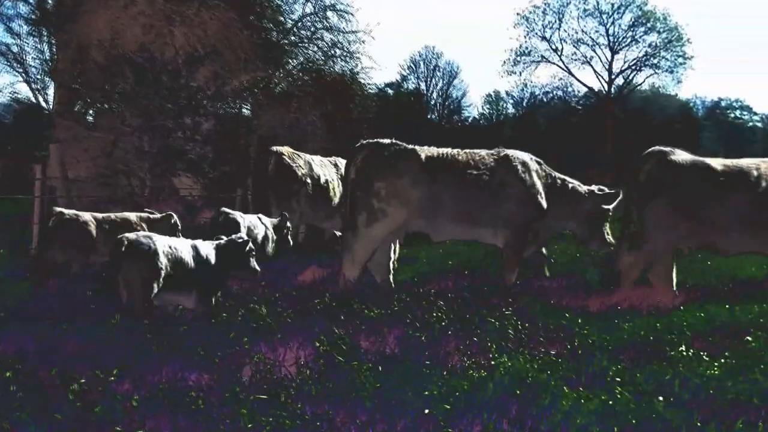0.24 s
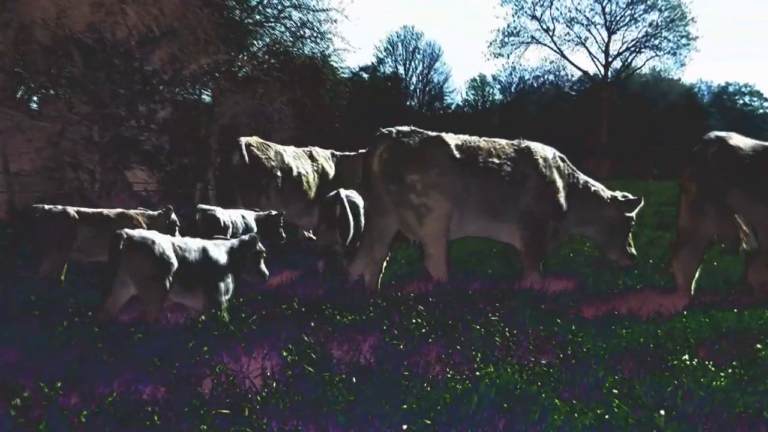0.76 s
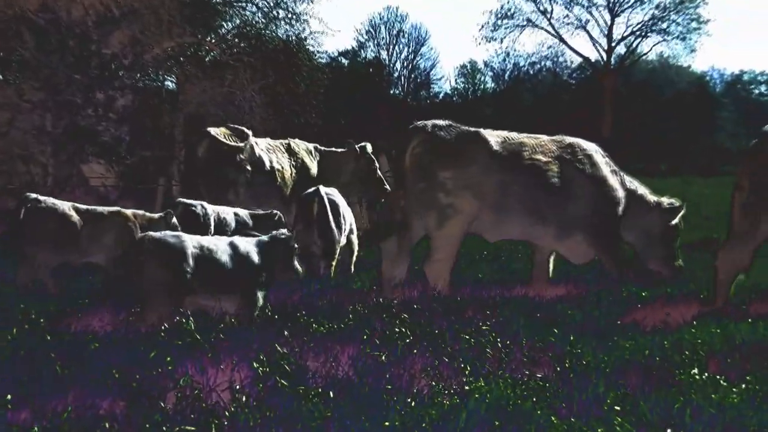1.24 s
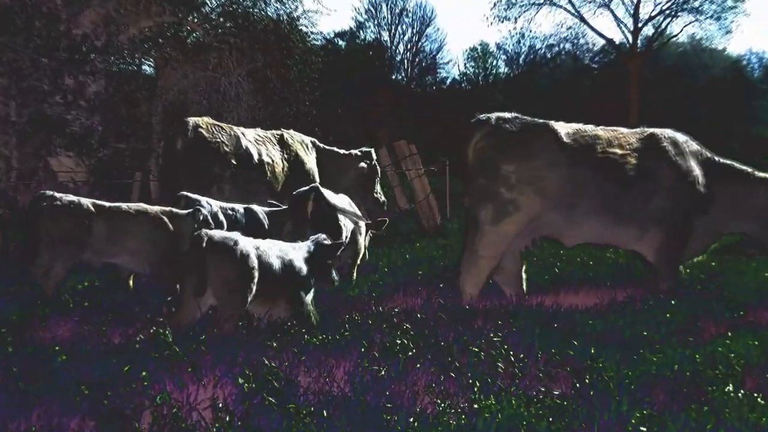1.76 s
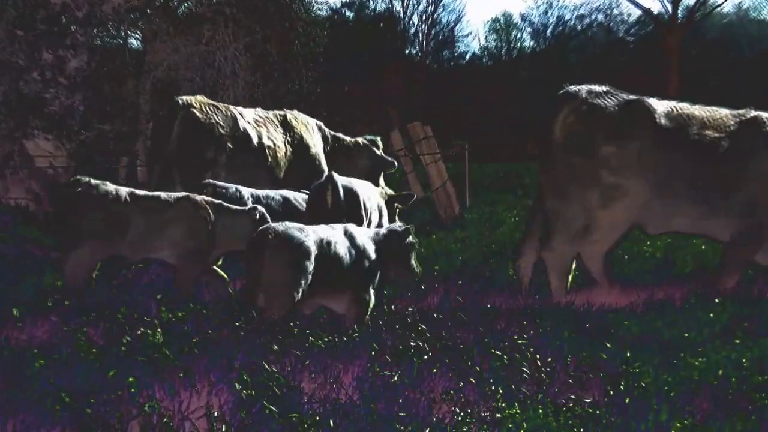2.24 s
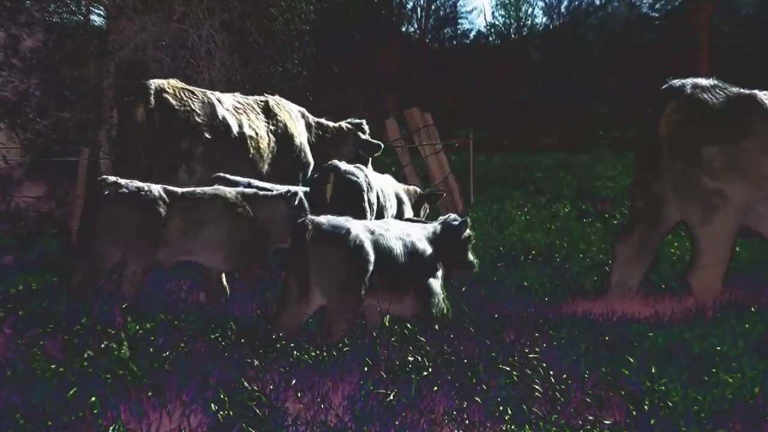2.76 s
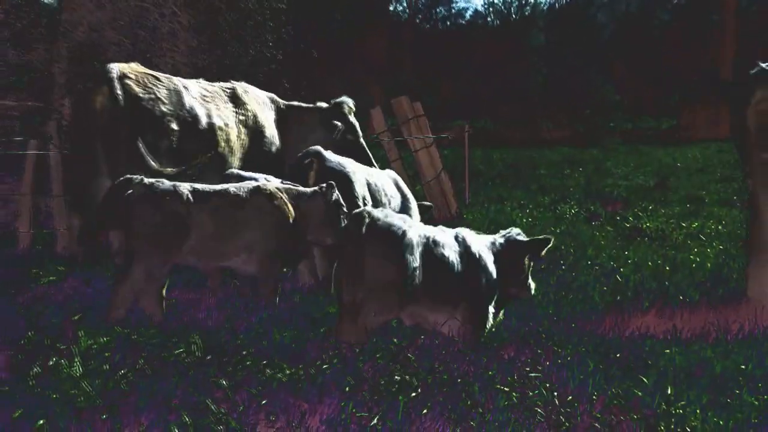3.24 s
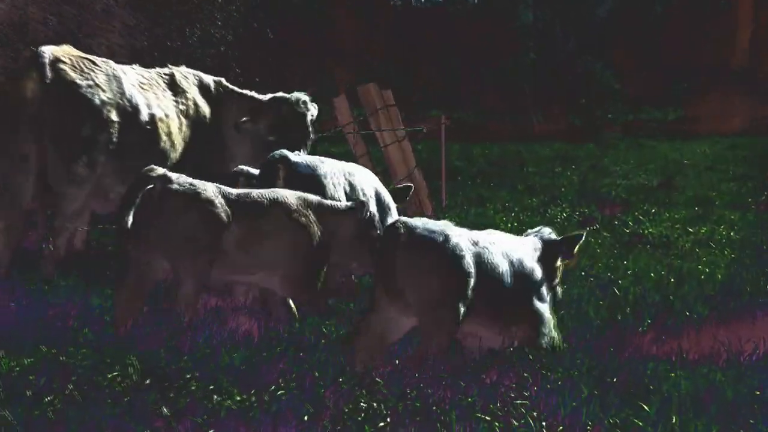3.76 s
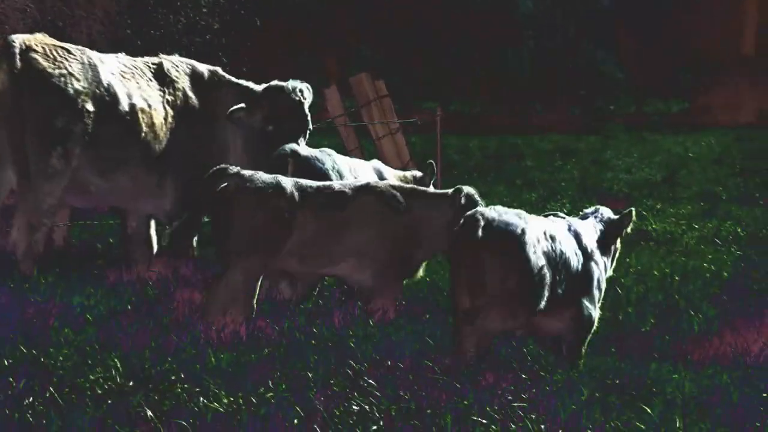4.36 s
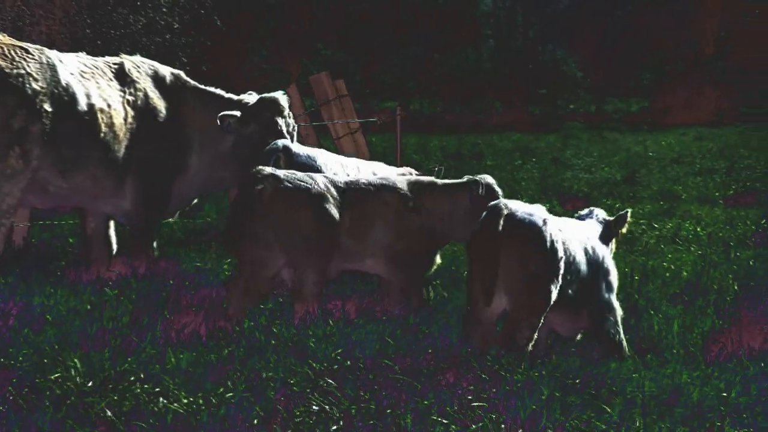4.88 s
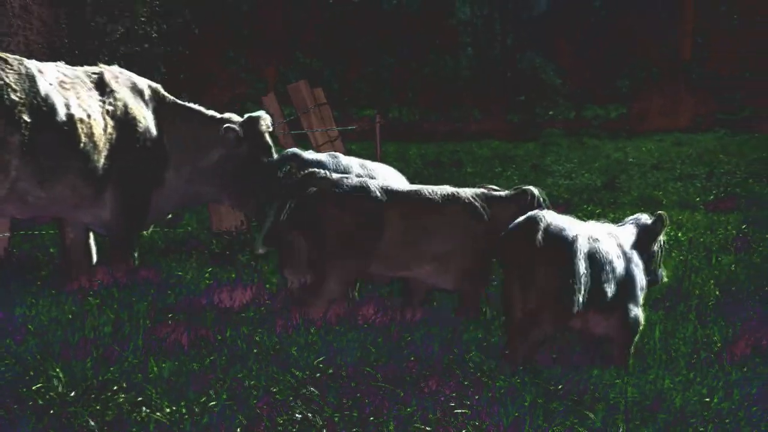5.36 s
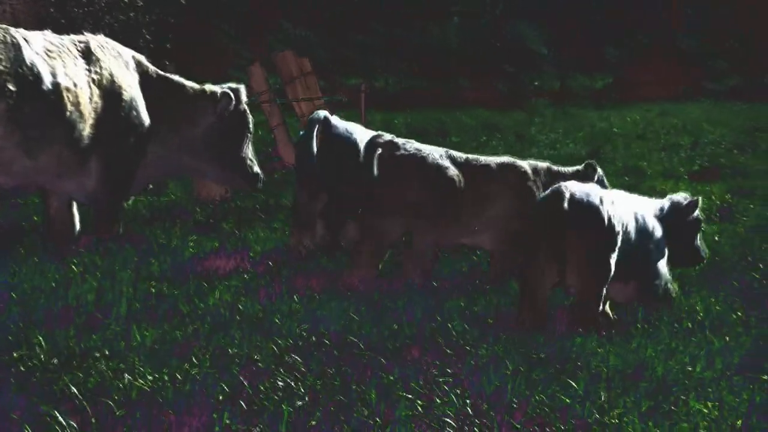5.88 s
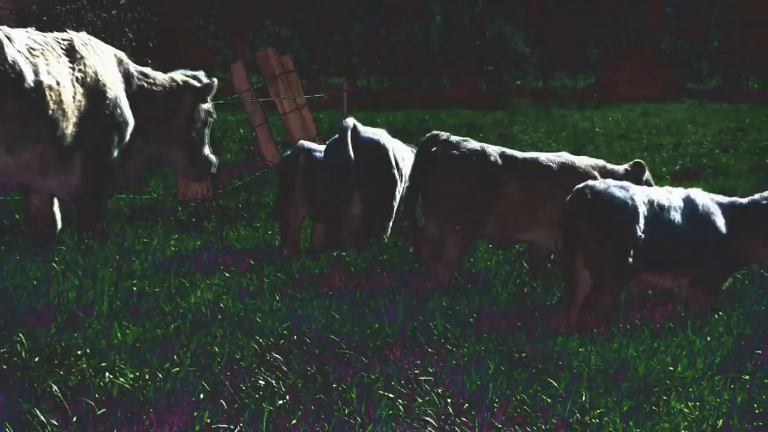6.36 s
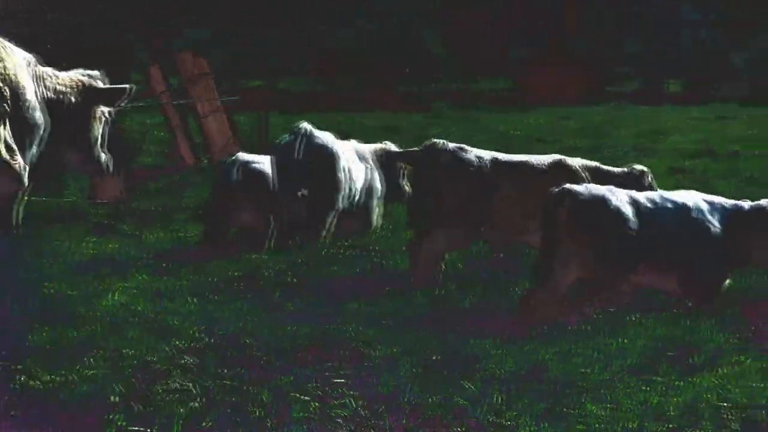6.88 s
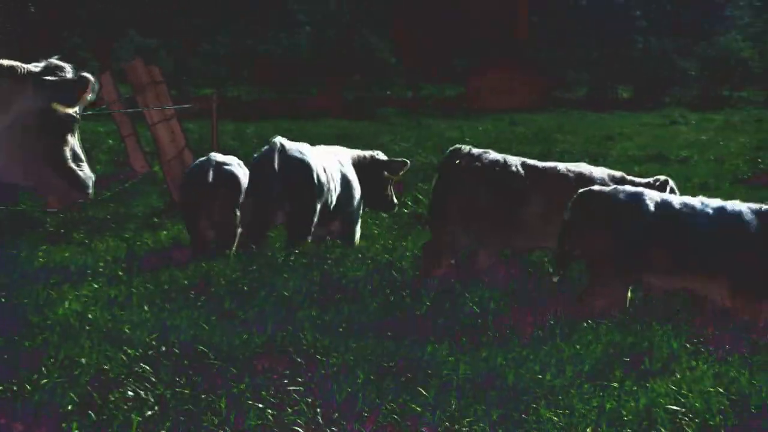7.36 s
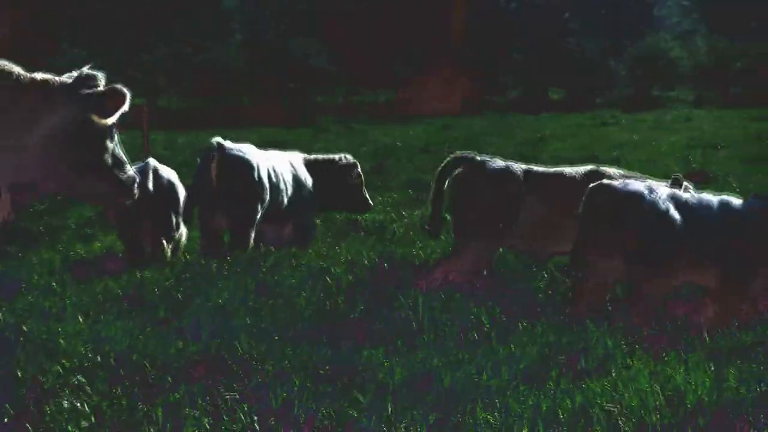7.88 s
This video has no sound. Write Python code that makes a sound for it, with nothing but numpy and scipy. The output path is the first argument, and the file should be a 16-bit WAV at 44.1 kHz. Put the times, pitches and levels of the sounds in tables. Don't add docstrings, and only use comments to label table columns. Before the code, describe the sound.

Faint leafy wash and thin birdsong with muted hoof thuds, broken by a very loud sharp snap, then scratchy finger rubbing on the camera casing.

```python
import sys
import numpy as np
from scipy import signal
from scipy.io import wavfile
from scipy.ndimage import uniform_filter1d

SR = 44100
rng = np.random.default_rng(int(sys.argv[2]) if len(sys.argv) > 2 else 0)


def unload_wav(signal):
    wavfile.write(
        sys.argv[1],
        SR,
        np.round(np.clip(np.atleast_2d(signal).T, -1, 1) * 32767).astype(np.int16),
    )


def gain_from_db(level_db):
    decades = np.asarray(level_db, float) / 20
    return 10 ** decades


N = 358533

# (time [s], peak [dB], left-right [dB], brightness [dB per octave])
SNAPS = [(0.1003, -30.5, -1, -2), (0.107, -42, -1, -3), (0.177, -22.5, -8, 3), (3.7863, -21.5, -5, -4),
         (4.29115, 4.5, -14, 13), (4.734, -34, -15, 6), (5.044, -43, -7, 6), (5.221, -30, 0, 19),
         (5.424, -21.5, -7, -9), (5.9015, -32, -9, -2), (6.0795, -28, -7, 7), (6.1483, -26.5, -3.0, 14),
         (6.275, -29, -4, 17), (1.885, -34, -1, 2), (4.128, -38.5, -1, 31), (5.0782, -32, -13, 15),
         (5.492, -28, -3, 16), (5.985, -42, -3, 27), (6.292, -33.5, -3, 27), (6.308, -40, -3, 8),
         (8.011, -44, -4, 18), (8.028, -42, -2, 20)]
# (lowest [Hz], highest [Hz])
FAST_FALL_HZ = (4500, 7150)


def evened(x):
    return x / np.sqrt(np.mean(x ** 2) + 1e-20)


def read(points, hz):
    f, value = np.transpose(points)
    return np.interp(np.log(hz + 1), np.log(f + 1), value)


def add(mix, s, sound, pan_db):
    part = mix[:, round(s * SR):][:, :np.shape(sound)[-1]]
    part += sound[..., :part.shape[1]] * gain_from_db([[pan_db / 2], [-pan_db / 2]])


def below(x, edge_hz):
    taps = signal.firwin(511, edge_hz, window=("kaiser", 9), fs=SR)
    return signal.oaconvolve(x, taps[None], "same")


def snaps():
    # (pitch [Hz], level [dB], time to fall 60 dB [s])
    housing_modes = [(910, -32, 0.046), (1480, 12, 0.021), (1990, 9.5, 0.019), (2360, 20.5, 0.0105),
                     (2900, 17.5, 0.0096), (3314, 25, 0.004), (3690, 12.5, 0.011), (4420, 16.5, 0.0059),
                     (4995, 9.5, 0.01), (5450, -6, 0.01), (6740, -7, 0.01), (7730, -16.5, 0.017),
                     (8980, -32, 0.016), (12600, -21, 0.0014)]
    mix, t = np.zeros((2, N)), np.arange(1300) / SR
    hz, mode_db, t60 = np.transpose(housing_modes)[:, :, None]
    lean_hz = [600, 1000, 1500, 2500, 4500, 7000, 12000]
    lean = np.interp(np.log(hz), np.log(lean_hz), [1.5, 2.4, 1.7, .5, .1, 0, 1.3])
    spreads = rng.uniform(-1, 1, (len(SNAPS), 2, len(hz), 1))
    for (s, db, pan_db, tilt_db), spread in zip(SNAPS, spreads):
        soft = np.clip(-db / 20, 0, 1.3)
        rings = gain_from_db(mode_db + tilt_db * np.log2(hz / 3000) - 60 * t / t60)
        rings *= 1 - np.exp(-t / (0.00017 + .0002 * soft))
        rings *= 1 + .9 * np.exp(-t / .0007)
        turn = 2 * np.pi * hz * (1 + .012 * spread[0]) * t + 1.3 * soft * spread[0]
        pair = []
        for side in (1, -1):
            shift = side * .12 * np.minimum(lean, 1) * spread[1]
            pair.append((rings * gain_from_db(side * pan_db * lean / 2) * -np.sin(turn + shift)).sum(0))
        pair = np.array(pair)
        add(mix, s + 0.00065, gain_from_db(db) * pair / abs(pair.mean(0)).max(), 0)
    return mix


def ring(x, modes):
    t = np.arange(2200) / SR
    body = 0
    for hz, width_hz, db in modes:
        swell = width_hz ** 1.5 * t * np.exp(-1.55 * np.pi * width_hz * t)
        body = body + gain_from_db(db) * swell * np.sin(2 * np.pi * hz * t)
    return signal.oaconvolve(x, body[None], axes=1)[:, :N]


def rubs():
    # (pitch [Hz], width [Hz], level [dB])
    shell = [
        [(500, 250, .1), (300, 220, -5), (900, 400, -5)],
        [(830, 70, 3), (650, 600, -7)],
    ]
    grip = [
        [(1345, 105, 4.5), (1020, 200, -8), (2250, 300, -6), (2470, 80, 5)],
        [(1504, 240, 3.2), (1130, 370, 1), (2150, 540, 1.5)],
    ]
    panels = [
        [(3485, 630, 1.5), (4100, 490, -3.5)],
        [(4465, 460, 1.5), (3980, 350, -2), (3100, 1230, 5), (5230, 1100, -9)],
    ]
    skin_hiss = [[(5550, 2950, 26), (7150, 530, 6.0), (9100, 3000, -6), (12000, 4300, -3)]] * 2
    # (left-right [dB]), then (left-right likeness [0-1])
    part_pan_db = [0, -8, -3, 0.5]
    part_likeness = [.4, .5, .8, .93]
    # (time [s], shell [0-1], grip [0-1], panels [0-1])
    finger = [(4.75, 0.3, 0.86, 0.046), (5.15, .4, 0.63, 0.37), (5.22, 0.31, 0.44, 0.94),
              (5.3, 0.29, 0.41, 0.97), (5.55, 0.15, 0.14, 0.78), (5.88, 0.04, .04, 0.39),
              (5.98, .05, 0.8, .4), (6.13, 0.58, 0.86, 0.56), (6.24, 1, .98, .98), (6.35, 1, 0.88, 0.62),
              (6.42, 0.47, 0.83, 0.33), (6.6, 0.043, 0.69, 0.078), (8.1, 0.19, 0.27, .03)]
    # (time [s], length [s], level [dB], weight [0-1])
    brushes = [
        (.1025, 0.0045, -54.5, 0.76),
        (.78, 0.01, -69, 0.93),
        (.85, 0.015, -69, 1),
        (.932, 0.0073, -63.5, 0.92),
        (1.345, 0.0057, -64, 0.6),
        (1.4, 0.013, -57.5, 0.57),
    ]
    slides = [(4.734, 0.065, -54.5, 0.5), (4.79, 0.067, -54, 0.33), (4.889, 0.047, -54.5, 0.24),
              (5.044, 0.071, -54, 0.058), (5.091, 0.078, -58.5, 0.25), (5.221, 0.028, -48.5, .01),
              (5.24, 0.035, -50.5, 0.49), (5.278, 0.088, -54, 0.66), (5.35, 0.054, -50.5, 0.12),
              (5.425, 0.062, -47, 0.67), (5.469, 0.07, -47, 0.43), (5.533, 0.082, -48, 0.43),
              (5.636, .02, -57, .6), (5.652, 0.029, -51.5, 0.7), (5.706, 0.029, -54, 0.76),
              (5.749, 0.063, -55.5, 0.87), (5.805, 0.067, -53, 0.7), (6.374, 0.029, -56.5, 0.43),
              (6.396, 0.021, -51, 0.48), (5.945, 0.011, -63, 1), (6.665, 0.0057, -48, 0.47),
              (6.677, 0.0084, -48.5, 0.51), (6.538, 0.01, -64, 0.54)]
    shifts = [(5.984, 0.045, -54.5, 1.2), (6.048, 0.017, -52, 1.23), (6.079, 0.023, -54, .01),
              (6.105, 0.044, -47.5, 1.16), (6.141, 0.042, -50, 0.011), (6.243, 0.017, -57, 1),
              (6.21, 0.048, -61.5, 1.05), (6.256, 0.057, -45.5, 0.93), (6.534, 0.017, -50.5, 1.1),
              (6.977, 0.01, -55.5, 1.2), (7.205, 0.012, -62, 0.4), (8.036, 0.036, -59, 0.75),
              (8.078, 0.18, -47.5, 0.27)]
    # (shell [dB], grip [dB], panels [dB], skin hiss [dB])
    brush_mix = [
        (-38, -6, 0, 4),
        (6, 9, 0, -17),
    ]
    slide_mix = [
        (-23, -6, 0, -3),
        (2.5, 3.5, 0, -15),
    ]
    shift_mix = [
        (-4.5, -26, 0, -29),
        (-2.5, -2.5, 0, -18.5),
    ]

    slips = rng.standard_normal((2, N)) * gain_from_db(1.6 * rng.exponential(1, N))
    slips *= rng.random(N) < 12000 / SR
    wobble = gain_from_db(1.1 * evened(uniform_filter1d(rng.standard_normal(N), 300)))
    touch_s, *places = np.transpose(finger)
    places = places + places[-1:]
    places = [np.clip(np.interp(np.arange(N) / SR, touch_s, place), 0, 1) for place in places]
    strokes = []
    for rows, (light, full) in ((brushes, brush_mix), (slides, slide_mix), (shifts, shift_mix)):
        for s, length, db, weight in rows:
            strokes.append((s, length, db + np.add(light, weight * np.subtract(full, light))))

    mix = np.zeros((2, N))
    for k, part in enumerate([shell, grip, panels, skin_hiss]):
        pressure, back = np.zeros((2, N)), places[k]
        for s, length, db in strokes:
            u = np.linspace(0, 1, round((length + 0.013) * SR))
            by_snap = min(abs(s - row[0]) for row in SNAPS) < .004
            rise = 0.014 if by_snap else 0.21
            press = np.clip(u / rise, 0, 1) * np.clip((1 - u) / 0.52, 0, 1)
            add(pressure, s - .001, gain_from_db(db[k]) * press, part_pan_db[k])
        same = np.clip(part_likeness[k], 0, 1)
        right = same * slips[0] + np.sqrt(1 - same ** 2) * slips[1]
        drive = np.array([slips[0], right]) * wobble
        for modes, share in zip(part, (1 - back, back)):
            rung = ring(drive * pressure * np.sqrt(share), modes)
            mix += gain_from_db(3.0) * rung / np.std(ring(drive[:, :SR], modes))
    return mix


def thuds():
    # (time [s], peak [dB], length [s])
    hooves = [(1.235, -55, 0.0085), (1.663, -44, 0.0097), (2.199, -37, 0.0084), (2.314, -41.5, 0.008),
              (2.352, -51, 0.01), (3.029, -46, 0.0075), (3.754, -37, 0.0047), (4.935, -38.5, 0.0063),
              (5.043, -49.5, 0.0084), (5.222, -49.5, 0.0063), (5.249, -44, 0.0086), (6.77, -52.5, 0.0066),
              (6.861, -51, 0.0048), (6.977, -55, 0.008), (7.212, -50.5, 0.0077), (7.698, -47, 0.0054),
              (8.095, -42.5, 0.0077)]
    # (time [s], peak [dB], length [s])
    knocks = [(5.564, -46, 0.0048), (5.826, -44.5, 0.0076), (5.86, -40.5, 0.0046), (5.916, -38, 0.0017),
              (5.985, -46, 0.0076), (6.015, -43.5, .0054), (6.05, -37, 0.0037), (6.106, -33.5, 0.0032),
              (6.124, -46, 0.016), (6.536, -32.5, 0.0042), (6.992, -47, 0.0061), (8.042, -43, 0.0046),
              (8.056, -46, 0.0093), (8.119, -39, 0.002)]
    # (time [s], peak [dB], pitch [Hz])
    taps = [(0.1784, -46, 430), (0.775, -54, 383), (1.339, -51.5, 314), (1.662, -47, 330),
            (3.787, -39, 334), (4.068, -47, 746), (4.292, -32, 398), (4.77, -43.5, 260), (4.795, -49, 274),
            (4.82, -46, 316), (5.425, -23, 377), (6.621, -45, 265), (6.706, -43, 263), (6.722, -45, 238),
            (6.968, -44.5, 302), (7.439, -54, 258), (7.474, -46, 322), (.1025, -39.5, 905),
            (.105, -50, 710), (.108, -38, 1400), (.113, -45, 805), (.116, -52, 480), (6.915, -54, 250),
            (6.983, -45, 298), (7.318, -50.5, 199), (7.68, -59, 180), (7.79, -50, 420), (7.829, -51, 194)]
    # (time [s], peak [dB], pitch [Hz], length [s])
    ticks = [(3.7877, -22, 2730, 0.00065), (.1787, -32.5, 4640, 0.00058), (.105, -42.5, 3280, .006),
             (6.182, -40, 4300, .002), (6.352, -45, 4600, .002), (7.792, -47, 4750, 0.0018),
             (6.258, -33, 4620, 0.0023), (6.0996, -41, 4600, 0.0034), (6.6685, -33, 3100, .0015),
             (6.679, -35, 4600, .0015), (3.788, -33, 2300, .003), (3.7875, -37, 5000, .0015),
             (3.788, -38, 620, .003), (6.404, -38, 3440, .002), (5.24, -37, 4100, .003),
             (5.5, -35.5, 2470, 0.0037)]
    hoof_hz, knock_hz, tap_cycles = 185, 490, 0.98
    pushes = [(s, db, hoof_hz, length) for s, db, length in hooves]
    pushes += [(s, db, knock_hz, length) for s, db, length in knocks]
    pushes += [(s, db, hz, tap_cycles / hz) for s, db, hz in taps]
    pushes += ticks
    mix = np.zeros((2, N))
    for (s, db, hz, length), phase in zip(pushes, rng.random(len(pushes))):
        u = np.arange(round(5 * length * SR)) / SR / length
        shape = 3.24 * u * np.e * np.exp(-2.6 * u)
        turn = 2 * np.pi * hz * length * u
        push = shape * np.sin(turn)
        if hz < 1500:
            push += 0.34 * shape ** 2 * np.sin(1.83 * turn + 2 * np.pi * phase)
        pan_db = np.interp(hz, [180, 500, 2500], [1.5, -7, -2.5])
        add(mix, s - .001, -gain_from_db(db) * push, pan_db)
    return mix


def slide(s, length, start_hz, end_hz, db):
    if end_hz > start_hz:
        share = .56
    elif FAST_FALL_HZ[0] < start_hz < FAST_FALL_HZ[1]:
        share = .62
    else:
        share = .35
    return s, length, start_hz, start_hz + share * (end_hz - start_hz), end_hz, db


def songs():
    # (time [s], length [s], pitch [Hz], level [dB])
    whistles = [(.124, .025, 5450, -62), (.435, .065, 4220, -60), (.74, .035, 5450, -64),
                (.935, .04, 5220, -63), (.89, .06, 4930, -63), (.685, .02, 5050, -63),
                (1.42, .025, 4690, -60), (1.46, .03, 4570, -63), (1.15, .07, 4400, -63),
                (1.215, .15, 4320, -62.5), (1.075, .05, 4200, -64), (1.475, .042, 5200, -59),
                (1.585, .018, 3560, -53), (1.628, .01, 3560, -56), (1.815, .06, 4300, -62),
                (1.72, .03, 3740, -61), (6.77, .04, 4590, -63), (7.16, .04, 4580, -63),
                (1.665, .145, 4320, -53), (1.856, .031, 3100, -54), (2.01, .045, 5210, -57),
                (2.2, .15, 4290, -54), (2.54, .05, 5080, -61), (2.765, .21, 4260, -56),
                (3.118, .03, 5030, -57), (3.27, .06, 3330, -62), (3.95, .05, 3440, -58),
                (4.11, .033, 5070, -55), (4.9, .08, 4680, -64), (6.315, .075, 4250, -59),
                (6.565, .018, 5900, -58), (7.335, .012, 4300, -60)]
    # (time [s], level [dB])
    phrases = [
        (2.2, -58.5),
        (2.865, -53.5),
        (3.545, -54),
        (4.213, -50.5),
    ]
    # (time after the start [s], length [s], pitch [Hz], level over the phrase [dB])
    low_notes = [
        (0, .068, 3640, 0),
        (.195, .088, 3635, 1),
    ]
    # (time after the start [s], length [s], pitch [Hz], level [dB])
    high_note = (.394, .125, 5535, -59)
    slur = (.366, .034, 5730, -57)
    # (first time [s], every [s], length [s], pitch [Hz])
    far_note = (6.6, .247, .055, 4690)
    far_db = [-63, -61, -58, -64, -62]
    # (time [s], length [s], pitch at start [Hz], level [dB])
    falls = [(2.795, .039, 7330, -60), (2.925, .042, 7290, -58), (3.025, .055, 6020, -53),
             (3.13, .06, 6020, -53), (3.26, .045, 5520, -50), (3.395, .051, 5520, -52.5),
             (3.7, .03, 7290, -62), (3.83, .05, 7420, -68), (3.935, .05, 5550, -58),
             (4.04, .045, 5520, -61), (4.15, .05, 5780, -64), (6.545, .03, 6900, -59),
             (7.18, .03, 6300, -63)]
    # (time [s], length [s], pitch at start [Hz], at end [Hz], level [dB])
    rises = [(.065, .012, 3750, 4050, -51.5), (.965, .022, 3850, 4200, -61), (.995, .03, 4250, 3900, -59),
             (.7, .015, 5050, 4500, -61), (6.81, .035, 6800, 6450, -63), (6.835, .035, 5800, 5150, -63),
             (6.835, .018, 4400, 4150, -57), (7.062, .025, 3750, 3250, -57), (7.205, .028, 4300, 4050, -56),
             (7.673, .03, 3980, 3800, -53.5), (7.7, .02, 3750, 3400, -57), (1.645, .025, 3050, 3250, -59),
             (1.84, .015, 3700, 3300, -59), (1.17, .075, 3400, 3800, -59), (1.253, .015, 3800, 3500, -61),
             (1.565, .008, 3700, 3750, -58), (1.578, .007, 3800, 3850, -54), (1.766, .013, 3330, 3850, -52),
             (1.787, .013, 3720, 3330, -52), (1.8, .008, 3380, 4150, -50), (1.808, .015, 3900, 3380, -50),
             (1.827, .009, 4450, 3650, -53), (1.837, .007, 3750, 3540, -54), (3.065, .05, 5230, 4970, -55),
             (.215, .04, 3700, 4050, -61), (1.969, .007, 5000, 3500, -59), (7.81, .03, 3800, 3200, -60),
             (1.51, .045, 3480, 3730, -57), (1.688, .03, 3420, 3650, -59), (1.925, .043, 3580, 5230, -52.5),
             (3.845, .027, 5020, 5360, -56), (4.085, .03, 3630, 5050, -50), (4.245, .027, 5050, 5500, -58),
             (4.4, .03, 5000, 5430, -58), (6.983, .01, 3900, 4000, -53), (6.996, .016, 4150, 4350, -52)]

    steady = list(whistles)
    for s, db in phrases:
        steady += [(s + after, length, hz, db + over) for after, length, hz, over in low_notes]
        steady.append((s + high_note[0], *high_note[1:]))
    first_s, every_s, far_length, far_hz = far_note
    steady += [(first_s + k * every_s, far_length, far_hz, db) for k, db in enumerate(far_db)]
    notes = []
    for s, length, hz, db in steady:
        end_hz = hz * (1.012 if hz > 5400 else .997)
        notes.append((s, length, hz * .992, hz, end_hz, db))
    after, short, high_hz, soft_db = slur
    for s, _ in phrases:
        notes.append(slide(s + after, short, high_hz, high_hz - 8000 * short, soft_db))
    for s, length, hz, db in falls:
        hz_per_s = -24000 if FAST_FALL_HZ[0] < hz < FAST_FALL_HZ[1] else -17500
        notes.append(slide(s, length, hz, hz + length * hz_per_s, db))
    return notes + [slide(*row) for row in rises]


def birds():
    direct = np.zeros((2, N))
    notes = songs()
    for (s, length, *hz, db), (beat, phase) in zip(notes, rng.random((len(notes), 2))):
        u = np.linspace(0, 1, round((length + 0.0068) * SR))
        pitch = np.polyval(np.polyfit([0, .5, 1], hz, deg=2), u)
        if length > .12 and hz[1] < 4400:
            pitch *= 1 - .025 * np.exp(-u * length / .012)
        waver = 1 + .3 * np.sin(2 * np.pi * ((8 + 12 * beat) * length * u + phase))
        fade_s = min(.016, .3 * length + .002)
        fade = np.clip(np.minimum(u, 1 - u) * (length + .012) / fade_s, 0, 1)
        note = np.sin(2 * np.pi * np.cumsum(pitch) / SR) * waver * fade * gain_from_db(-6 * u)
        add(direct, s - .004, gain_from_db(db + 5.0) * note, -.6)
    t = np.arange(SR // 2) / SR
    trees = rng.standard_normal((2, len(t))) * (rng.random((2, len(t))) < .15)
    trees *= gain_from_db(-60 * t / .8) * (t > .02)
    echoes = signal.oaconvolve(direct, trees / np.linalg.norm(trees[0]), axes=1)[:, :N]
    return direct + gain_from_db(-8) * echoes


def wash():
    # (time [s], level [dB])
    leaves = [(0.0, -51), (1.0, -50.5), (1.79, -49.5), (3.7, -49), (4.62, -48.5), (5.09, -51), (5.43, -46),
              (5.8, -50), (6.5, -50), (7.83, -49), (8.13, -50.5)]
    # (pitch [Hz], level [dB per Hz])
    colour = [(15, -40), (25, -7.5), (130, -6.5), (350, -3), (516, -6), (1130, -1), (2450, 0), (4740, -5),
              (6740, -14), (10700, -13.5), (16000, -22.5)]
    # (pitch [Hz], likeness [0-1])
    likeness = [(25, .8), (60, 0.6), (180, 0.016), (550, 0.0044), (1650, 0.61), (4970, 0.92), (15000, 0.96)]
    # (time [s], half length [s], level [dB])
    gusts = [
        (0.498, 0.13, 2),
        (1.29, 0.11, 2),
        (2.622, 0.1, 4.5),
        (7.65, 0.033, 4),
        (7.946, 0.045, 1),
    ]
    # (pitch [Hz], width [Hz], before [dB], after [dB])
    pocket = [(1540, 180, 2.7, 6), (2500, 630, 0.075, 3.5), (3240, 470, 0.25, 4.5), (4830, 1000, 0.075, -3),
              (7540, 460, 4.7, 0.5)]

    frames, hz = N // 256 + 5, np.fft.rfftfreq(1024, 1 / SR)
    a, b, c, d, patches = rng.standard_normal((frames, 513, 5)).T
    patches = evened(uniform_filter1d(uniform_filter1d(patches, 12, 0), 10, 1))
    flicker = evened(uniform_filter1d(rng.standard_normal(frames), 6))
    t, (s, level_db) = np.arange(frames) * 256 / SR, np.transpose(leaves)
    middle = np.interp(t, s, level_db - np.mean(level_db))
    high = sum(db * np.exp(-((t - at) / half) ** 2) for at, half, db in gusts)
    rows_hz = hz[:, None]
    to_high = np.clip((rows_hz - 5000) / 1500, 0, 1)
    swell_db = to_high * high + (1 - to_high) * np.clip(rows_hz / 900, 0, 1) * middle
    moved = np.clip((t - 7) / 4.3 + .5, 0, 1)
    for peak_hz, width, before_db, after_db in pocket:
        bump = np.exp(-((rows_hz - peak_hz) / width) ** 2)
        swell_db = swell_db + bump * (before_db + moved * (after_db - before_db))
    same = np.clip(read(likeness, hz), -1, 1)[:, None]
    left = a + 1j * b
    z = np.array([left, same * left + np.sqrt(1 - same ** 2) * (c + 1j * d)])
    z *= gain_from_db(read(colour, hz)[:, None] + swell_db + 1.0 * patches + 0.77 * flicker)
    noise = signal.istft(z, nperseg=1024, noverlap=768)[1][:, :N]
    return gain_from_db(-52) * evened(noise)


def sways():
    # (time [s], level [dB], pitch [Hz], half length [s])
    swells = [
        (5.068, -62, 54.6, .04),
        (5.3, -70, 50, .08),
        (5.83, -71, 57.7, 0.087),
        (6.0, -64, 50, .06),
        (6.37, -69, 52.2, .08),
        (6.71, -65, 45, .05),
        (7.45, -70, 50, .12),
        (7.79, -69, 42.2, .05),
        (8.03, -68, 85, 0.046),
    ]
    t, mix = np.arange(N) / SR, np.zeros(N)
    for s, db, hz, half in swells:
        mix += gain_from_db(db + 3) * np.exp(-((t - s) / half) ** 2) * np.sin(2 * np.pi * hz * t)
    return mix


def hum():
    # (multiple of the turning rate [times], level [dB])
    orders = [(4, -88), (5, -83), (6, -80), (8, -80), (10, -79), (12, -86)]
    motor_hz, end_s, whine_hz, whine_db = 37.5, 4.35, 9700, -85.5
    t = np.arange(N) / SR
    starts = rng.random(len(orders))
    tone = np.zeros((2, N))
    for side, lag in enumerate((0, .25)):
        for (k, db), start in zip(orders, starts):
            tone[side] += gain_from_db(db + 7.5) * np.sin(2 * np.pi * (k * motor_hz * t + start + lag))
    whine = gain_from_db(whine_db) * np.sin(2 * np.pi * whine_hz * t)
    return tone * np.clip((end_s - t) / 0.37, 0, 1) + whine


def scene():
    knee = 0.52
    edge_hz, snap_edge_hz = 15780, 16500
    jolts = thuds() + snaps() + below(rubs(), edge_hz)
    over = np.maximum(abs(jolts) - knee, 0)
    jolts = jolts - np.sign(jolts) * (over - (1 - knee) * np.tanh(over / (1 - knee)))
    jolts = signal.sosfilt(signal.butter(3, 95, "high", fs=SR, output="sos"), jolts)
    return below(wash() + sways() + hum() + birds(), edge_hz) + below(jolts, snap_edge_hz)


def roll_off(x):
    return signal.sosfilt(signal.butter(12, 17080, fs=SR, output="sos"), x)


def record(dry):
    duck_s, hold_s, duck_hz, treble_left = 4.3015, .012, 2600, .1
    t = np.arange(N) / SR
    dropped = 1. * (t > duck_s) * (t < duck_s + hold_s)
    duck = (1 - treble_left) * uniform_filter1d(dropped, size=40)
    x = np.clip(dry, -1, 1)
    x = x - duck * (x - below(x, duck_hz))
    return roll_off(x)


dry = scene()
out = record(dry)
unload_wav(out)
```